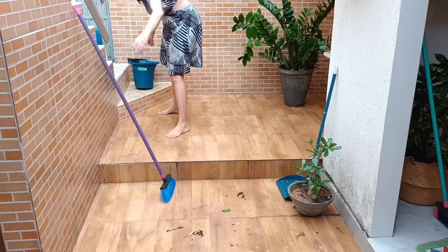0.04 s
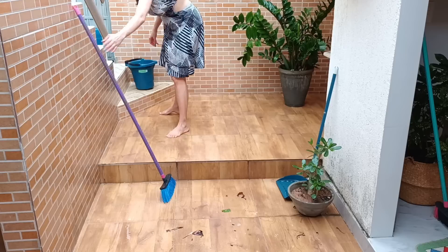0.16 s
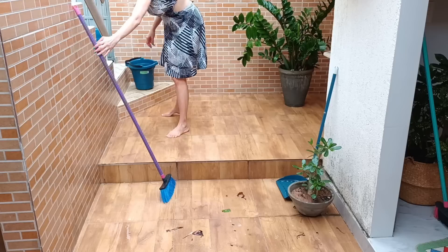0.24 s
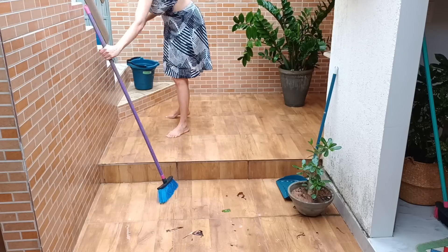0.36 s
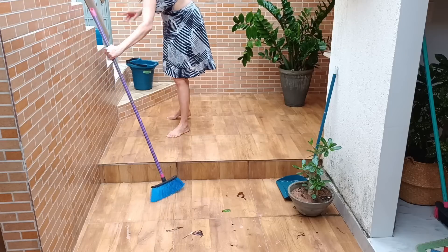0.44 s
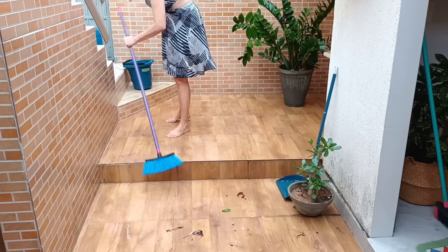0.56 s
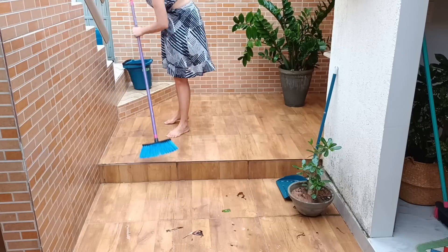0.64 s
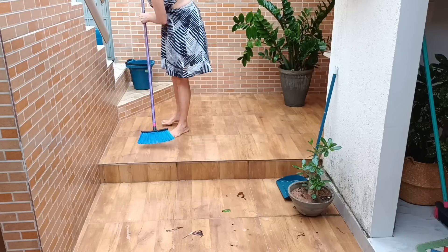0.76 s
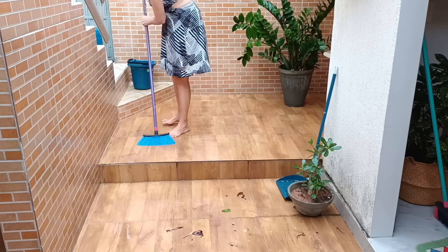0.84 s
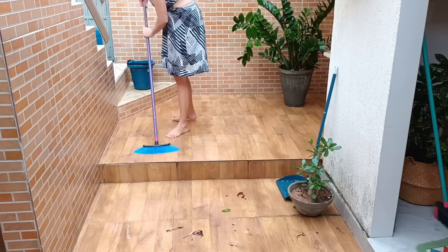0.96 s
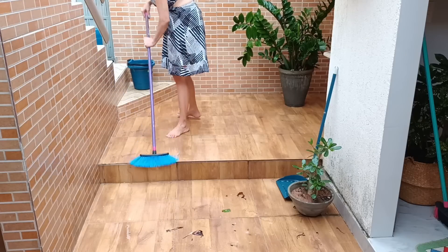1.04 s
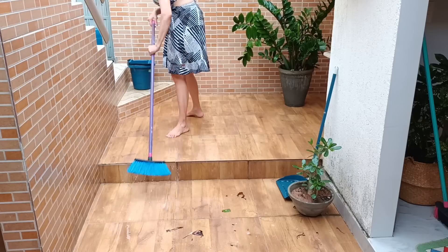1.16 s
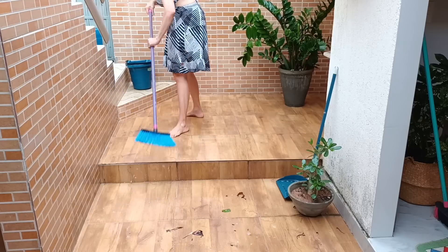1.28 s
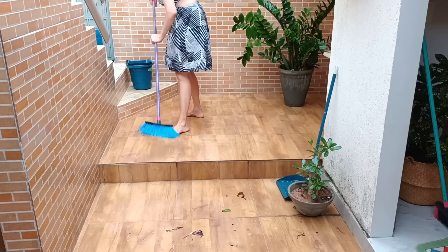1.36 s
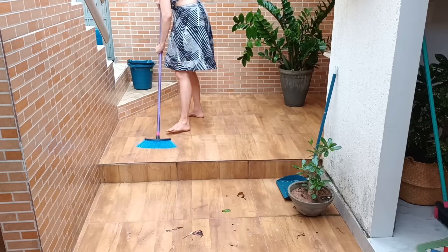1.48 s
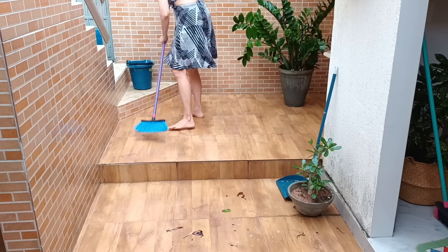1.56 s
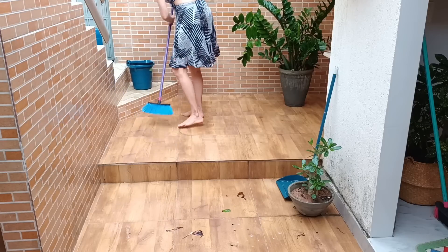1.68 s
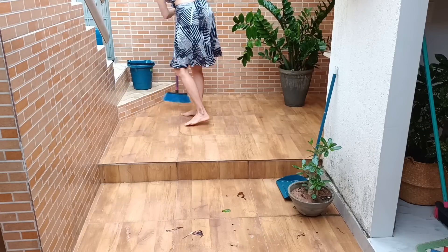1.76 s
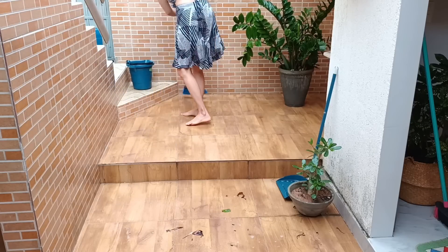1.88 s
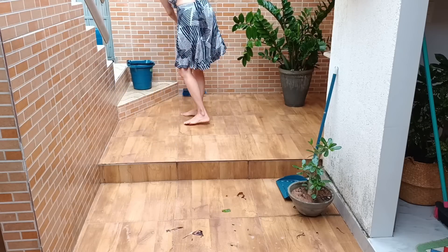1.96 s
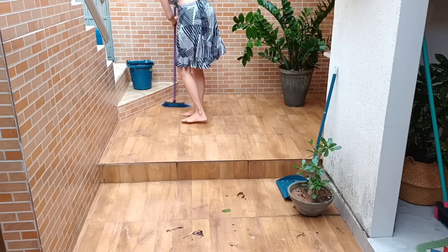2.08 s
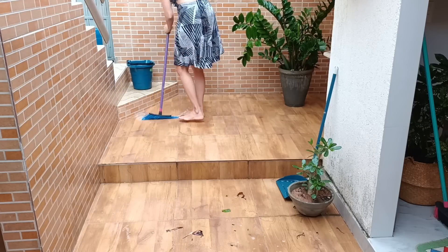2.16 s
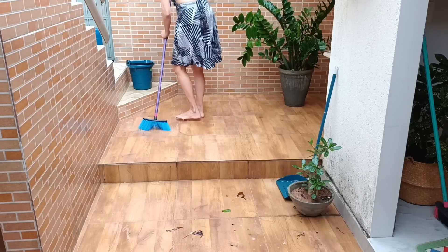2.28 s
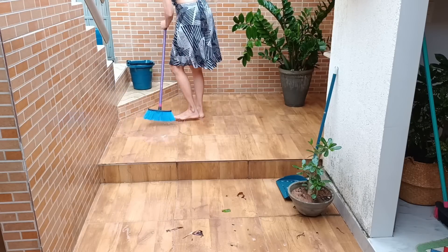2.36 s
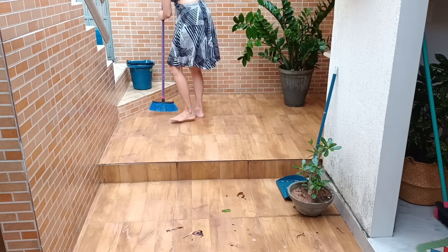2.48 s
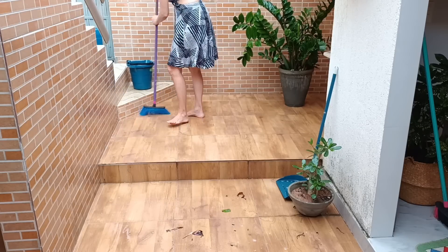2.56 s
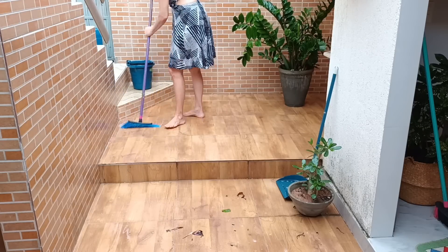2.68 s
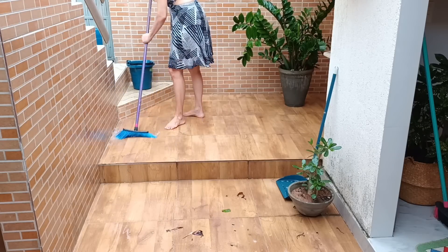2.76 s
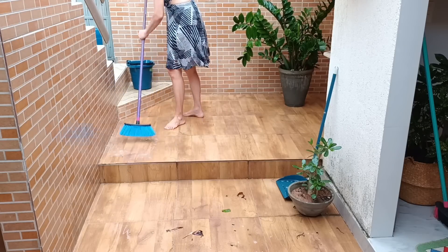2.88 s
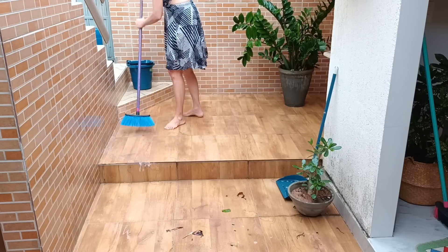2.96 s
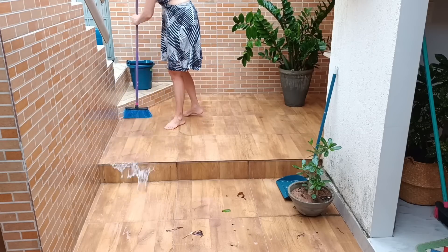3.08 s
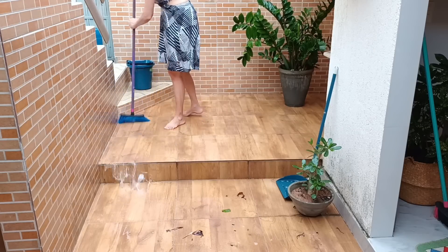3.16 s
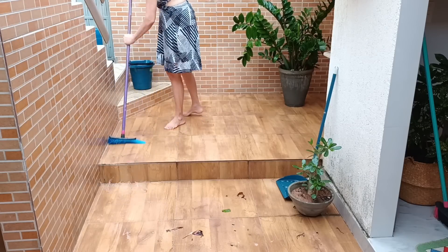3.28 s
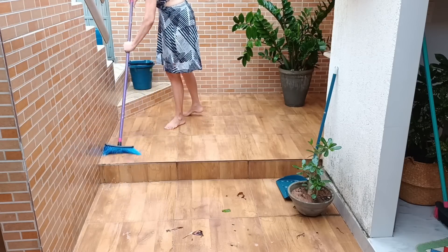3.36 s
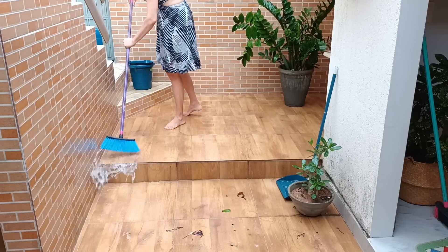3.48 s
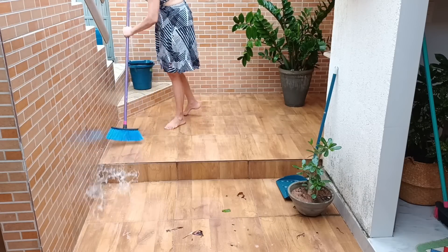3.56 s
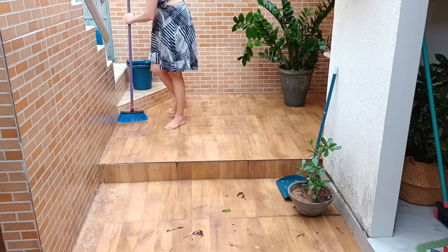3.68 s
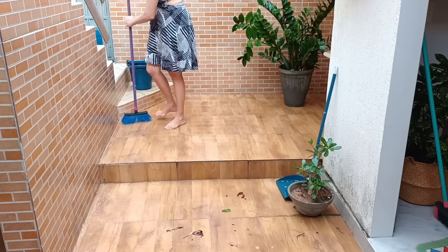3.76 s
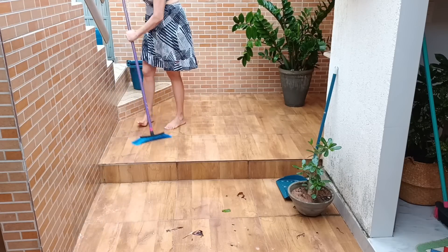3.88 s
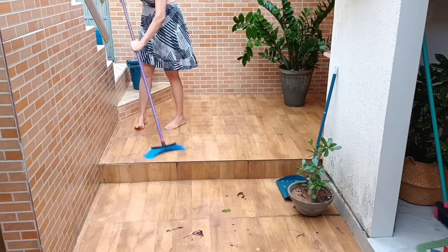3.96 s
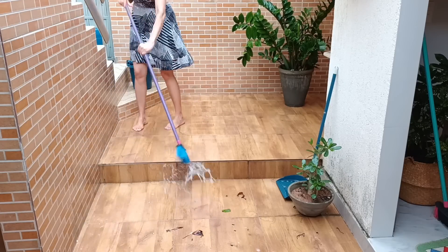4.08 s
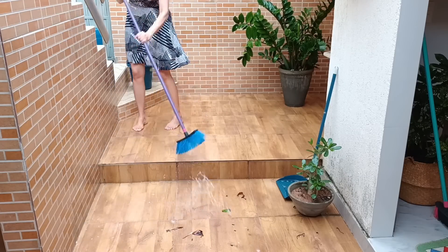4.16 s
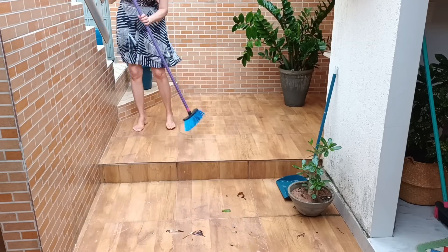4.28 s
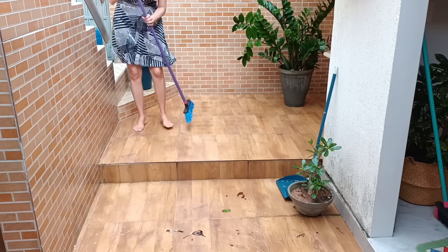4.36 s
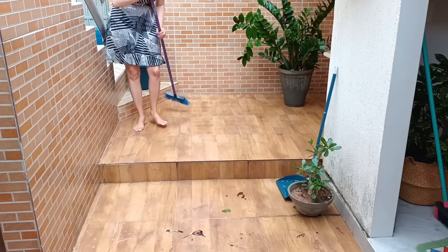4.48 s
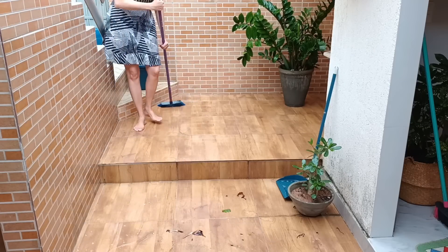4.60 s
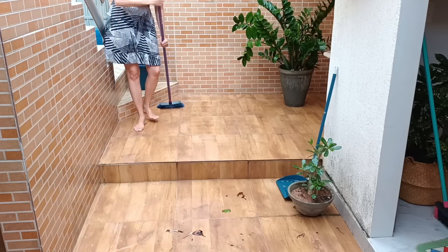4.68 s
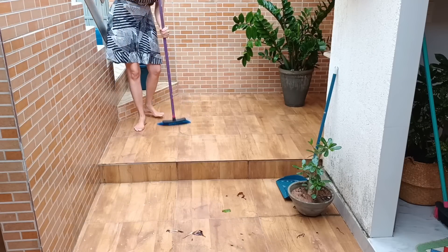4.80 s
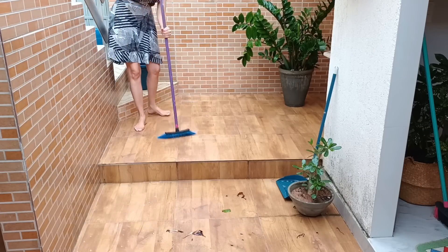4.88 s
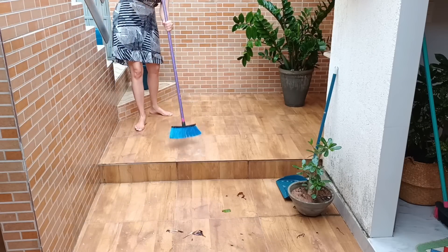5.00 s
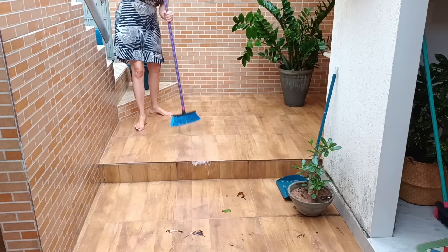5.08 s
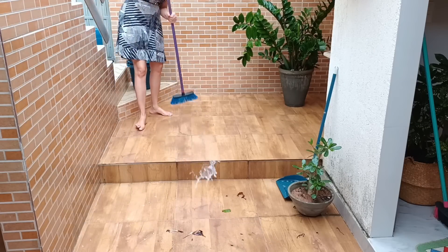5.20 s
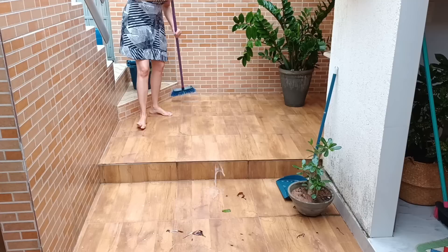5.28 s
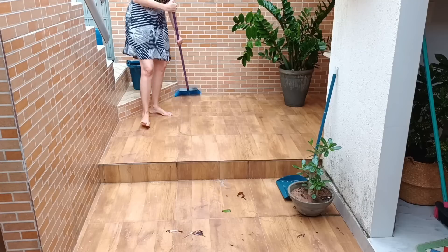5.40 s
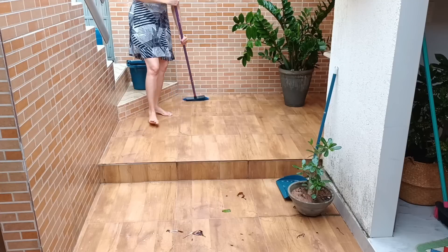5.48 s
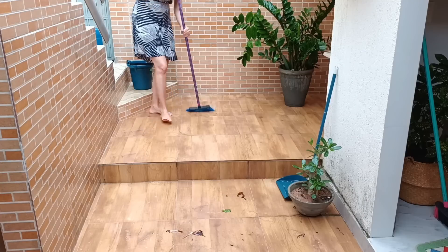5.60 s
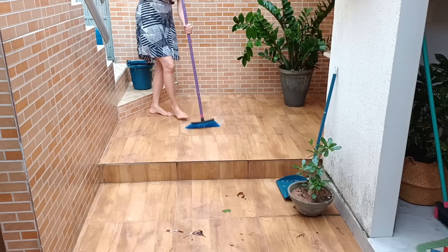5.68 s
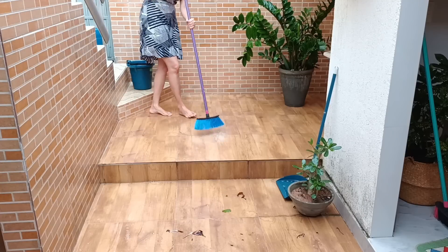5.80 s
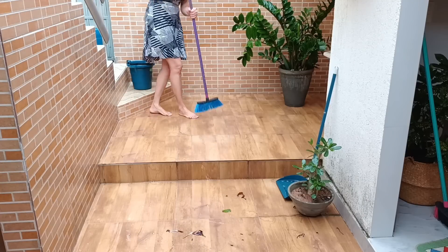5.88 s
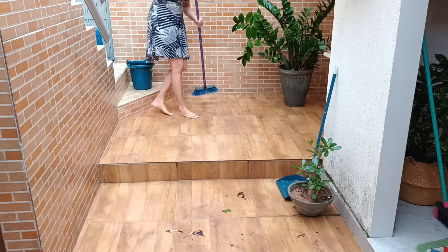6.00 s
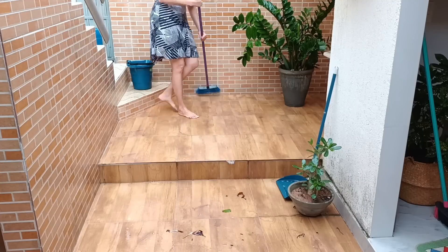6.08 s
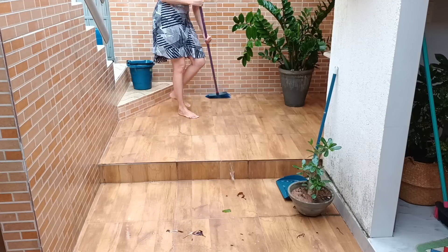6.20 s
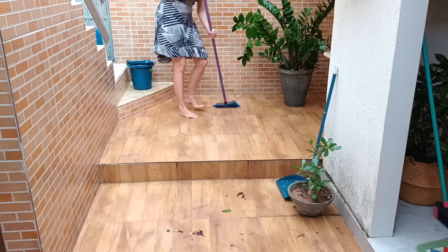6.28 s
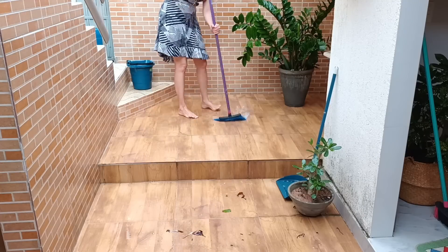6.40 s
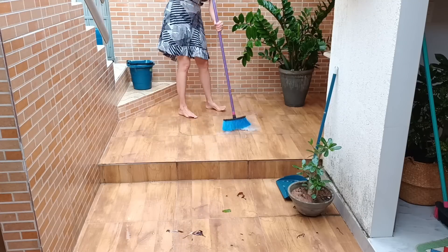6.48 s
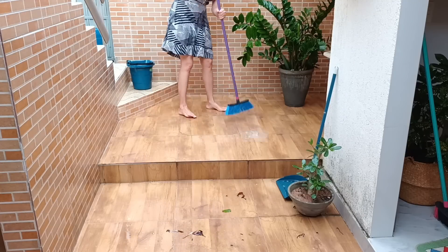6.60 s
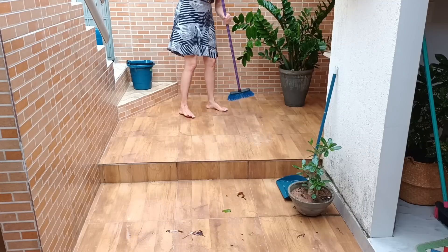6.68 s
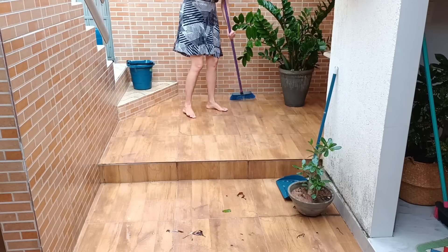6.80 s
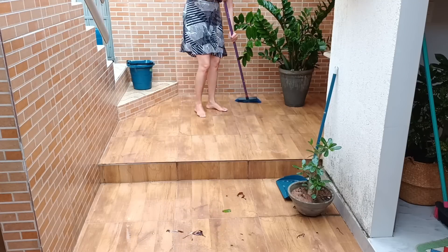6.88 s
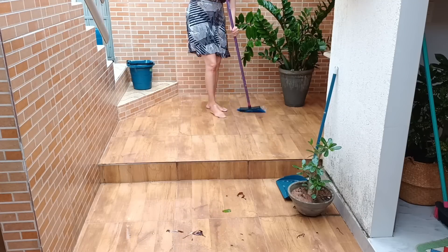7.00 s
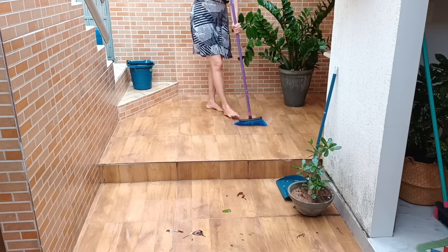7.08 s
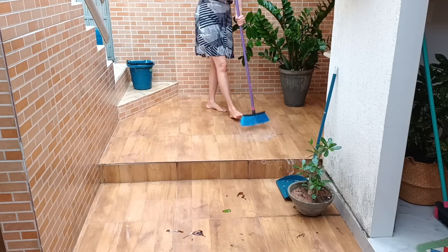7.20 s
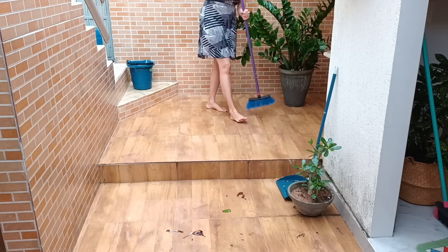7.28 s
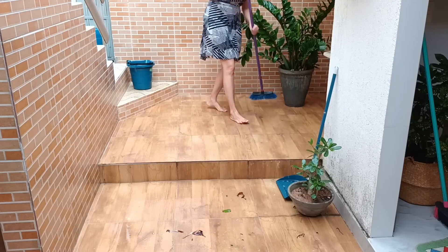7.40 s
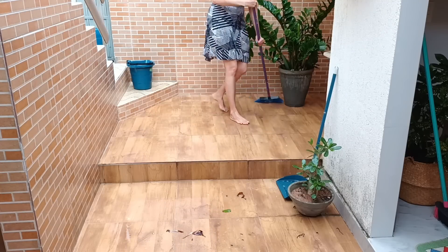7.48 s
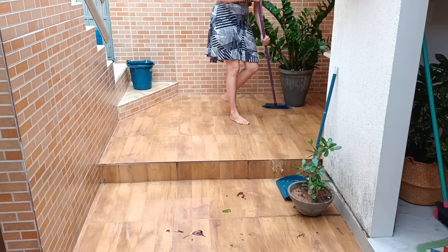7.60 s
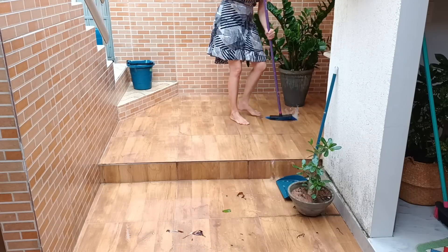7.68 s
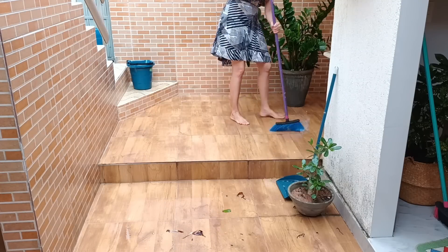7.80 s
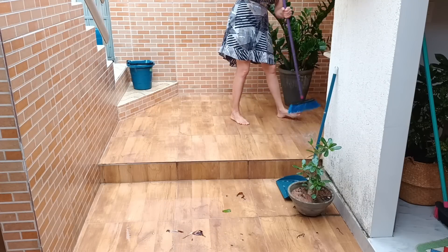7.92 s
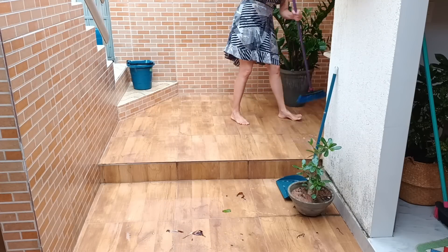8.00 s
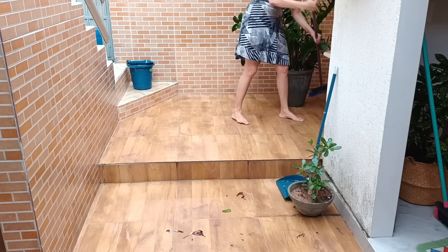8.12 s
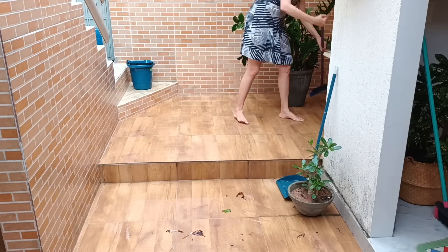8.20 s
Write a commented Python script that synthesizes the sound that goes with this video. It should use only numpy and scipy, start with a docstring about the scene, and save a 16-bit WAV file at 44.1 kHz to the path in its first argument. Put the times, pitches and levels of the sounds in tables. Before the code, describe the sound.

A stiff plastic broom scrubs wet tiles on a walled patio, with hissing, frothy strokes a little under a second apart and light taps as it lands. Near the start a gate rattles and its hinge creaks into a thin squeal. Water slops over a step, loudest around the middle and again near the end. A breeze rumbles and softly thumps on the microphone over faint town noise.

```python
"""A tiled patio between brick walls, where a stiff plastic broom pushes water about every 0.7 s.
Bristles flick and hiss, bubbles resonate in the froth ahead of them, and water slops over a step
onto the lower tiles. Early on a gate rattles in its frame and its hinge creaks by stick-slip
friction. A breeze rumbles on the microphone, with low thumps from handling or gusts, over the
faint wash of the town."""
import sys
import numpy as np
from scipy import signal
from scipy.fft import rfft, irfft, next_fast_len
from scipy.io import wavfile
from scipy.ndimage import uniform_filter1d

SR = 44100
rng = np.random.default_rng(int(sys.argv[2]) if len(sys.argv) > 2 else 0)


def generate_wav(sig):
    """Save sig (samples, or channels by samples) to the path in sys.argv[1] as 16-bit PCM at SR."""
    pcm = np.round(np.clip(np.atleast_2d(sig).T, -1, 1) * 32767).astype(np.int16)
    wavfile.write(sys.argv[1], SR, pcm)


N = 363825
T = np.arange(N) / SR

# spectrum of bristle tips on wet tile: (frequency [Hz], level [dB])
BRISTLE_SPECTRUM = [(700, -28.5), (1500, -45), (2600, -9.5), (4500, -4.5), (7000, -2), (9500, -0.5),
                    (12000, -4), (15500, -12)]
# spectrum of frothing water: (frequency [Hz], level [dB])
FROTH_SPECTRUM = [(500, -27), (900, -19), (1500, -3), (2100, 1), (2650, 1), (3200, -3), (4000, -5.5),
                  (6000, -9.5), (12000, -13)]


def undb(db):
    """Decibels to amplitude ratio."""
    return 10 ** (np.asarray(db) / 20)


def unit(x):
    """Normalisation to rms 1."""
    return x / np.sqrt(np.mean(x ** 2) + 1e-18)


def curves(rows):
    """Linear interpolation of each column over the times in the first."""
    times, *columns = np.transpose(rows)
    return [np.interp(T, times, column) for column in columns]


def at_hz(points, hz):
    """Interpolation of a spectrum on a log-frequency axis."""
    frequencies, levels = np.transpose(points)
    return np.interp(np.log(hz + 1), np.log(frequencies), levels)


def colour(x, spectrum):
    """Spectral shaping by (frequency [Hz], level [dB]) points, to rms 1."""
    size = next_fast_len(x.shape[-1] + 2048)
    gain = undb(at_hz(spectrum, np.fft.rfftfreq(size, 1 / SR)))
    return unit(irfft(rfft(x, size) * gain, size)[..., :x.shape[-1]])


def tilt(x, pivot_hz, db):
    """Shelving: the bands above and below the pivot move db apart."""
    low = signal.sosfiltfilt(signal.butter(2, pivot_hz, fs=SR, output="sos"), x)
    return low * undb(-db / 2) + (x - low) * undb(db / 2)


def fade(t, t60):
    """Exponential damping, 60 dB in t60."""
    return undb(-60 * t / t60)


def burst(t, rise_s, t60):
    """Impact envelope: a quick rise, then exponential damping."""
    return (1 - np.exp(-t / rise_s)) * fade(t, t60)


def wander(rate_hz):
    """Smooth random modulation of rms 1."""
    step = int(SR / rate_hz)
    held = np.repeat(rng.standard_normal(N // step + 1), step)
    return unit(uniform_filter1d(held, step)[:N])


def add(track, start_s, sound):
    """Superposition of a sound on the track."""
    i = max(int(start_s * SR), 0)
    track[i:i + len(sound)] += sound[:max(N - i, 0)]


def echoes(early_db, tail_db, early_t60, low_t60=0.6, treble_t60=0.3):
    """Stereo reflections off tiles and walls, then a tail that absorption dulls."""
    t = T[:2 * SR // 3]
    early, low, high = rng.standard_normal((3, 2, len(t)))
    b, a = signal.butter(1, 4000, fs=SR)
    low, high = signal.lfilter(b, a, low), high - signal.lfilter(b, a, high)
    tail = (low * fade(t, low_t60) + high * fade(t, treble_t60)) * (t > .012)
    early = early * fade(t, early_t60) * (t > .001)
    return (undb(early_db) * unit(early) + undb(tail_db) * unit(tail)) / np.sqrt(len(t))


def patio(x, early_db, tail_db, early_t60=0.2, hold_s=.006, spots=4, left_lag_s=0.000908):
    """Direct plus reflected sound: an extended source hops among spots, each with its own echoes."""
    size, hold = next_fast_len(N + SR, True), int(hold_s * SR)
    active = np.repeat(rng.integers(0, spots, N // hold + 1), hold)[:N]
    reflected = 0
    for spot in range(spots):
        share = uniform_filter1d(1. * (active == spot), hold // 2)
        response = echoes(early_db, tail_db, early_t60)
        reflected += rfft(np.float32(x * share), size) * rfft(np.float32(response), size)
    direct = np.array([np.pad(x, (int(left_lag_s * SR), 0))[:N], x])
    total_power = 1 + undb(early_db) ** 2 + undb(tail_db) ** 2
    return (direct + irfft(reflected, size)[:, :N]) / np.sqrt(total_power)


def rumble_and_thumps():
    """A breeze rumbles on the microphone; a resonance near 60 Hz thumps, from handling or gusts."""
    # steady breeze: (time [s], level [dB])
    breeze_levels = [(0, -49.5), (.5, -54.5), (1.3, -49), (1.7, -42.5), (2.6, -46), (3.35, -54),
                     (3.75, -45.5), (5.05, -40), (6.25, -39), (6.75, -44.5), (7.2, -48), (8.25, -50.5)]
    # low thumps: (peak time [s], half width [s], level [dB])
    thump_peaks = [(1.5, 0.037, -39.5), (1.8, 0.09, -51), (3.55, .08, -40), (4.3, 0.096, -35),
                   (4.63, 0.14, -44), (4.882, 0.087, -29), (5.72, .05, -38), (5.96, .09, -47),
                   (6.25, 0.064, -47)]
    # spectrum of the rumble: (frequency [Hz], level [dB])
    rumble_spectrum = [(30, -38), (60, -6), (100, 0.5), (160, 0), (230, -13), (400, -28.5), (900, -47)]
    # spectrum of the low thumps near 60 Hz: (frequency [Hz], level [dB])
    thump_spectrum = [(15, -50), (32, -34), (44, -26), (55, -5), (63, 1.5), (76, -18.5), (120, -11.5),
                      (250, -41), (600, -80)]
    breeze = undb(curves(breeze_levels)[0])
    swells = sum(undb(db) * np.exp(-((T - peak_s) / width_s) ** 2) for peak_s, width_s, db in thump_peaks)
    rumble = colour(rng.standard_normal(N), rumble_spectrum) * np.hypot(breeze, undb(-10) * swells)
    rumble *= undb(wander(15))
    thumps = colour(rng.standard_normal(N), thump_spectrum) * np.hypot(undb(-9) * breeze, swells)
    return rumble + thumps


def town():
    """The town's wash is a diffuse field, only weakly correlated between the channels."""
    # spectrum of the wash: (frequency [Hz], level [dB])
    spectrum = [(25, -37), (70, -14.5), (170, -1), (300, -3.5), (550, -8.5), (1200, -13), (1900, -22),
                (3200, -28), (8000, -27), (15000, -34)]
    wash = rng.standard_normal((2, N)) + 0.27 * rng.standard_normal(N)
    return colour(wash, spectrum) * undb(-46.5 + 1.2 * wander(8.7))


def gate():
    """Impacts excite a clatter and the loose panel's damped modes, whose pitch shifts with its seating."""
    # knocks in the frame: (time [s], level [dB], frequency ratio set by the seating [1])
    knocks = [(0.009, -33.5, .85), (0.035, -34, 1.06), (0.624, -23, 0.78), (0.643, -13.5, 0.91),
              (0.658, -22, .86), (0.692, -23, .9), (0.732, -26.5, 1.03), (0.966, -22.5, 1.02),
              (0.992, -30.5, 0.78), (1.054, -30, 1.1), (1.117, -17.5, 1), (1.147, -19.5, 0.97),
              (1.194, -21.5, .99), (1.248, -27.5, 0.96), (1.441, -33, 1), (1.592, -23, .93),
              (1.614, -27, 1), (1.675, -24, 0.89), (1.714, -23, 0.94), (1.759, -26, 1.03),
              (1.829, -27, 0.86), (1.899, -35.5, .9)]
    # panel modes: (frequency [Hz], level [dB], T60 [s])
    modes = [(180, -10, .15), (253, -15, 0.23), (282, -2.5, 0.32), (325.9, 6, 0.38), (336.4, -3.5, 0.62),
             (555, -19, 0.1), (648, -8, 0.083), (757, -19, 0.18), (1000, -16.5, 0.9), (1863, -7.5, 0.092)]
    # spectrum of the clatter: (frequency [Hz], level [dB])
    clatter_spectrum = [(40, -45), (100, -25), (170, -2.5), (290, 5), (360, 8.5), (460, -19), (650, 6),
                        (1200, -6), (1900, -8), (3000, -20), (6000, -53)]
    out, t = np.zeros(N), T[:SR // 2]
    for start_s, db, seating in knocks:
        shares = rng.normal(1, 0.3, len(modes))
        ring = sum(share * undb(mode_db) * np.sin(2 * np.pi * hz * seating * t) * burst(t, 0.0011, t60)
                   for share, (hz, mode_db, t60) in zip(shares, modes))
        shifted = np.array(clatter_spectrum) * [seating, 1]
        clatter = colour(rng.standard_normal(len(t)), shifted) * burst(t, 0.00061, 0.14)
        add(out, start_s, undb(db) * (undb(-8) * ring + undb(-2.5) * clatter))
    return patio(out, early_db=-1, tail_db=-2.5, hold_s=0.038)


def landings():
    """Impact noise: the bristles strike the floor all at once and slap the film of water."""
    # the broom head lands: (time [s], tick level [dB], slap level [dB])
    impacts = [(0.085, -35, -39), (0.54, -29, -45), (0.9664, -25, -25), (1.576, -28, -28),
               (1.599, -17, -31), (1.843, -34.5, -37.5), (2.0785, -20, -23.5), (2.6771, -29, -21),
               (3.195, -31, -38), (3.7373, -18.5, -25), (4.73, -24, -34.5), (5.3868, -34, -34),
               (5.5028, -22, -23.5), (6.241, -26.5, -23.5), (6.937, -23, -33.5), (8.2146, -31, -39)]
    out, t = np.zeros(N), T[:SR // 4]
    for start_s, tick_db, slap_db in impacts:
        tick, slap = rng.standard_normal((2, len(t)))
        tick = colour(tick, BRISTLE_SPECTRUM) * undb(tick_db - 3.5) * burst(t, 0.00042, 0.056)
        slap = unit(tilt(colour(slap, FROTH_SPECTRUM), 940, -16.5))  # a thin film sounds lower than froth
        slap *= undb(slap_db - 0.5) * burst(t, 0.0011, 0.082)
        add(out, start_s, tick + slap)
    return patio(out, early_db=5.5, tail_db=7.5)


def slops(pop_t60=0.015, patter_t60=0.19, spray_t60=0.35):
    """Falling water traps air that resonates in a pop; drops patter near that pitch and spray scatters."""
    # water hits the lower tiles: (time [s], level [dB], air resonance [Hz], relative spray level [dB])
    splashes = [(0.345, -39, 1880, -9), (2.095, -32.5, 1000, -13), (2.195, -34.5, 950, -15),
                (2.46, -33, 724, 5.5), (2.885, -19.5, 2530, -19), (3.219, -17, 1070, 7),
                (3.232, -18.5, 814, -15), (3.451, -11.5, 2550, -21), (3.52, -12.5, 2650, -18),
                (4.734, -38, 1300, -11), (5.4, -35, 1730, -5), (5.501, -28.5, 1140, 3.5),
                (6.26, -21.5, 1350, -7.5), (6.799, -32, 1100, -16), (6.853, -26.5, 1104, -7.5),
                (7.462, -19, 1350, -4), (7.499, -22.5, 1300, -4.5), (7.596, -26.5, 1550, -4),
                (7.594, -24.5, 2650, -20), (7.655, -26.5, 1470, -25), (8.11, -37.5, 910, 13)]
    # spectrum of the spray: (frequency [Hz], level [dB])
    spray_spectrum = [(200, -18), (520, -17.5), (800, -10), (1200, -0.5), (1500, -8), (1900, -1.5),
                      (2800, -8), (4200, -17), (8000, -26.5), (15000, -28)]
    out, t = np.zeros(N), T[:SR // 3]
    for start_s, db, hz, spray_db in splashes:
        band = [(hz / 3, -45), (hz * 0.72, -14), (hz, 0), (hz * 1.6, -12), (hz * 3, -40), (hz * 8, -60)]
        patter = colour(rng.standard_normal(len(t)), band) * burst(t, 0.0035, patter_t60)
        spray = colour(rng.standard_normal(len(t)), spray_spectrum)
        spray *= fade(t, spray_t60) + undb(3.5) * fade(t, 0.0093)
        pop = np.sin(2 * np.pi * hz * t * (1 + 1.2 * t)) * burst(t, 0.00058, pop_t60)
        add(out, start_s, undb(db) * (undb(-7) * patter + undb(spray_db - 8) * spray + undb(9.5) * pop))
    return patio(out, early_db=4, tail_db=-1, hold_s=.01)


def strokes(lift_t60=0.36, pile_up_db_per_s=24, run_on_s=0.019, settle_t60=0.54, trickle_t60=0.96):
    """Stroke envelopes add in power: each swells, holds and lifts, while water piles up and settles."""
    # pushes and dabs: (time [s], swell [s], length [s], hiss level [dB], froth level [dB],
    # treble tilt of a light touch [dB], bass tilt of a deep puddle [dB])
    pushes = [(0.478, 0.061, 0.075, -28.5, -48, -3, 7), (1.013, 0.052, 0.17, -24.5, -45, 7, -15),
              (1.3, 0.027, 0.063, -38, -49, -7, -7), (1.563, 0.011, .04, -31.5, -54, 7.5, -6),
              (2.065, .004, 0.011, -38, -43, 14, 6), (2.127, .022, 0.29, -25, -35, -0.5, -6),
              (2.69, 0.038, 0.24, -24.5, -32.5, 2.5, 0), (3.222, 0.053, 0.27, -22.5, -20.5, 3.5, -7.5),
              (3.734, 0.014, 0.039, -26, -27, -2, -8), (3.872, 0.09, 0.28, -24.5, -37.5, 7.5, 1.5),
              (4.267, 0.029, 0.056, -29, -34, -3, -18), (4.71, 0.0072, 0.082, -52, -48, 21, -9),
              (4.817, 0.11, .26, -21.5, -38, 5.5, 0), (5.37, 0.011, 0.03, -36, -33.5, 6, -8.5),
              (5.485, 0.018, 0.079, -41, -50, 9, -13), (5.568, 0.063, 0.3, -24.5, -35, 4, -5),
              (6.118, .015, 0.042, -44.5, -65, -6, 6), (6.233, 0.016, 0.061, -33.5, -52, -2, 0),
              (6.29, 0.069, 0.33, -25.5, -29.5, 1, 2), (6.909, 0.01, 0.14, -41.5, -46.5, 2, -9),
              (6.989, .1, 0.29, -23.5, -31.5, 4.5, -11), (7.367, .015, 0.087, -41.5, -41, -8, 4),
              (7.562, 0.0086, 0.053, -40, -38.5, 2, -6), (7.651, 0.06, 0.31, -27.5, -34.5, -3, 13.5)]
    wet_floor_db, trickle_db = -59.5, -19  # wet tiles fizz faintly between strokes
    hiss_power, water_power, tilts = np.zeros(N), np.full(N, undb(wet_floor_db) ** 2), []
    t = T[:3 * SR // 2]
    for start_s, swell_s, length_s, hiss_db, water_db, light_db, depth_db in pushes:
        push = (1 - np.exp(-np.minimum(t, length_s) / swell_s)) ** 2
        lift = fade(np.maximum(t - length_s, 0), lift_t60)
        crest_s = length_s + run_on_s  # the water surges on a moment longer
        to_go, since = np.maximum(crest_s - t, 0), np.maximum(t - crest_s, 0)
        settle = np.maximum(fade(since, settle_t60), undb(trickle_db) * fade(since, trickle_t60))
        add(hiss_power, start_s, (undb(hiss_db) * push * lift) ** 2)
        add(water_power, start_s, (undb(water_db - pile_up_db_per_s * to_go) * push * settle) ** 2)
        tilts += [(start_s + length_s / 2, light_db, depth_db), (start_s + length_s, light_db, depth_db)]
    return np.sqrt(hiss_power), np.sqrt(water_power), *curves(sorted(tilts))


def bristles(hiss, light_db, flicks_per_s=7500, spread_db=3):
    """Shot noise: bristle tips catch and flick on the wet glaze; a light touch sounds finer."""
    sizes = undb(spread_db * np.minimum(rng.exponential(size=N), 5))
    flicks = (rng.random(N) < flicks_per_s / SR) * sizes * rng.choice([-1, 1], N)
    return tilt(colour(flicks, BRISTLE_SPECTRUM), 7660, light_db) * hiss * undb(0.38 * wander(45))


def bubbles(per_s=3500, cycles=20, spread_db=2.5, pitches=28):
    """Bubble resonance: each small air pocket rings as a damped oscillator of rising pitch."""
    out, count = np.zeros(N), int(per_s * N / SR / pitches)
    for hz in np.geomspace(800, 8000, pitches):
        t = T[:int(cycles / hz * SR)]
        life = t * hz / cycles
        ring = np.sin(2 * np.pi * hz * t * (1 + 0.074 * life)) * fade(life, 0.72)
        births = rng.integers(0, N, 6000)[:count]
        strengths = undb(spread_db * np.minimum(rng.exponential(size=6000), 4.5))[:count]
        samples = births[:, None] + np.arange(len(t))
        out += hz * np.bincount(samples.ravel(), np.outer(strengths, ring).ravel(), N)[:N]
    return out


def froth(water, depth_db):
    """Water churns ahead of the bristles; deeper water holds bigger bubbles, which resonate lower."""
    fizz = colour(bubbles(), FROTH_SPECTRUM)
    return tilt(fizz, 2900, -depth_db) * water * undb(wander(22) - 1.5)


def broom():
    """An extended source: hiss and froth radiate from the whole width of the broom head."""
    hiss, water, light_db, depth_db = strokes()
    scrub = bristles(hiss, light_db) + froth(water, depth_db)
    return undb(3.5) * patio(scrub, early_db=10, tail_db=6, early_t60=0.13, spots=10)


def hinge(harmonics=25):
    """Stick-slip friction in a dry hinge makes a harmonic creak that thins to a squeal."""
    # creak: (time [s], slip rate [Hz], level [dB])
    creak_path = [(.57, 221.2, -51), (.61, 227.8, -35), (.72, 243.8, -28), (.88, 246.8, -28),
                  (.98, 242, -26), (1.05, 239.5, -30), (1.17, 233, -28.5), (1.38, 215.6, -38.5),
                  (1.46, 214.3, -55)]
    # resonances of the hinge: (frequency [Hz], level [dB])
    resonances = [(240, -29), (720, -13.5), (980, -3), (1220, -5), (1480, -15), (1750, -11), (1980, -7),
                  (2200, -4), (2440, 3), (2700, -9.5), (3000, -4), (3600, -13), (4400, -22.5), (7000, -37)]
    # closing squeal: (time [s], frequency [Hz], level [dB])
    squeal_path = [(1.0, 1850, -57), (1.1, 1750, -53), (1.27, 1855, -33.5), (1.42, 1845, -37),
                   (1.52, 1820, -41), (1.57, 1845, -72)]
    slip_hz, creak_db = curves(creak_path)
    jitter = np.interp(T, [.65, .78, 1.0, 1.15], [.012, .002, .003, .016])
    phase = 2 * np.pi * np.cumsum(slip_hz * (1 + jitter * wander(120))) / SR
    slipping = (T > creak_path[0][0]) & (T < creak_path[-1][0])
    creak = np.zeros(N)
    creak[slipping] = unit(sum(undb(at_hz(resonances, k * slip_hz[slipping])) * np.sin(k * phase[slipping])
                               for k in range(1, harmonics + 1)))
    squeal_hz, squeal_db = curves(squeal_path)
    squeal_phase = 2 * np.pi * np.cumsum(squeal_hz * (1 + 0.005 * wander(91.2))) / SR
    squealing = (T > squeal_path[0][0]) & (T < squeal_path[-1][0])
    squeal = np.sin(squeal_phase) * squealing * undb(squeal_db - 0.5)
    creak *= undb(creak_db + 2.2 * wander(59.97))
    return patio(creak + squeal, early_db=4, tail_db=1, hold_s=.035, spots=5)


def scene():
    """Superposition of broom and water, the gate, low microphone noise and the town."""
    return broom() + landings() + slops() + hinge() + gate() + rumble_and_thumps() + town()


def record(dry, cutoff_hz=15900):
    """Microphone response: the left channel is fuller below the treble; a steep low-pass cuts the top."""
    # channel balance: (frequency [Hz], left minus right level [dB])
    balance = [(60, 9), (110, 8), (200, 9.5), (380, 8.5), (700, 9), (1290, 10.5), (2380, 11.5), (4400, 3.5),
               (8120, -2), (15000, -0.5)]
    size = next_fast_len(N + 4096)
    hz = np.fft.rfftfreq(size, 1 / SR)
    gains = undb(np.outer([.5, -.5], at_hz(balance, hz)))
    gains /= np.sqrt(np.mean(gains ** 2, axis=0))
    heard = irfft(rfft(dry, size) * gains, size)[:, :N]
    return signal.sosfilt(signal.ellip(10, .2, 80, cutoff_hz, fs=SR, output="sos"), heard)


dry = scene()
out = record(dry)
generate_wav(out)
```